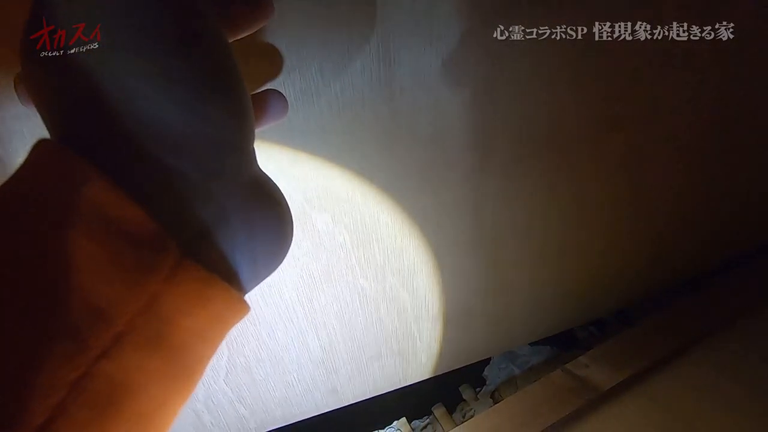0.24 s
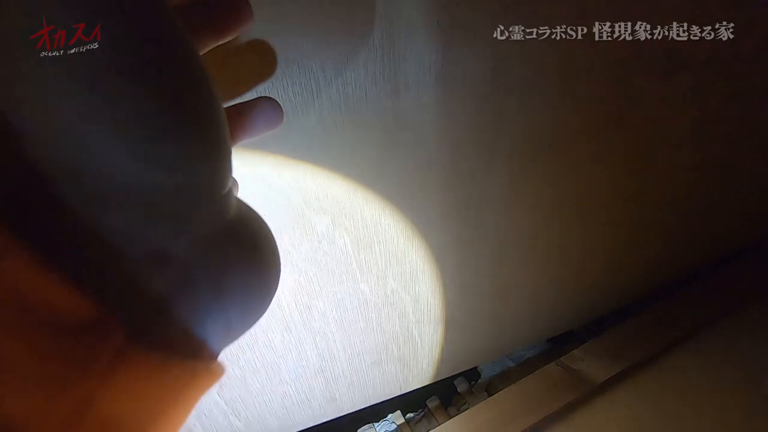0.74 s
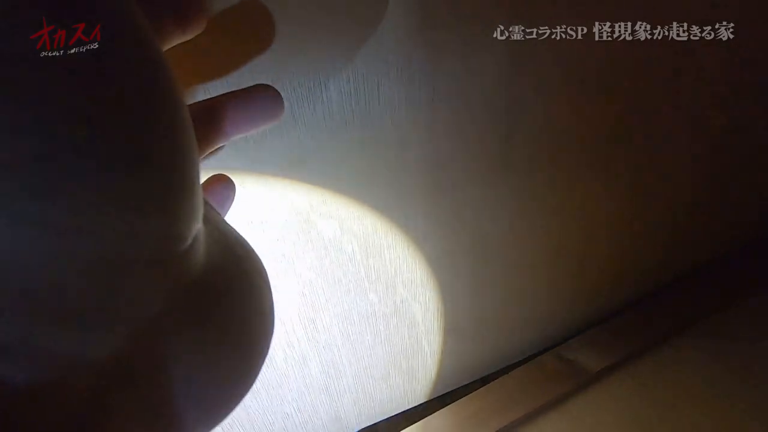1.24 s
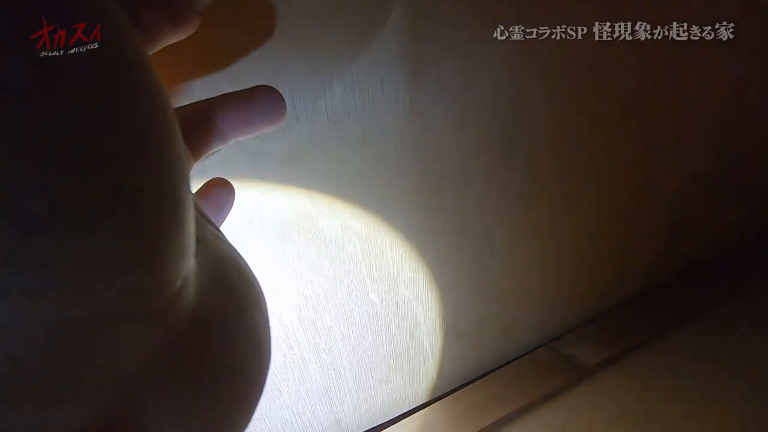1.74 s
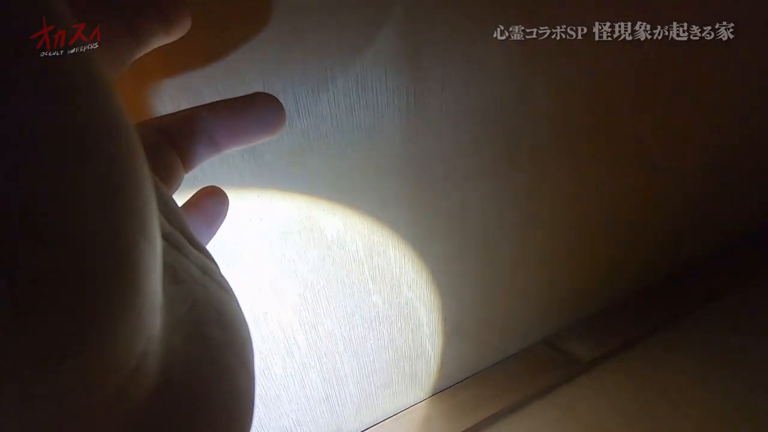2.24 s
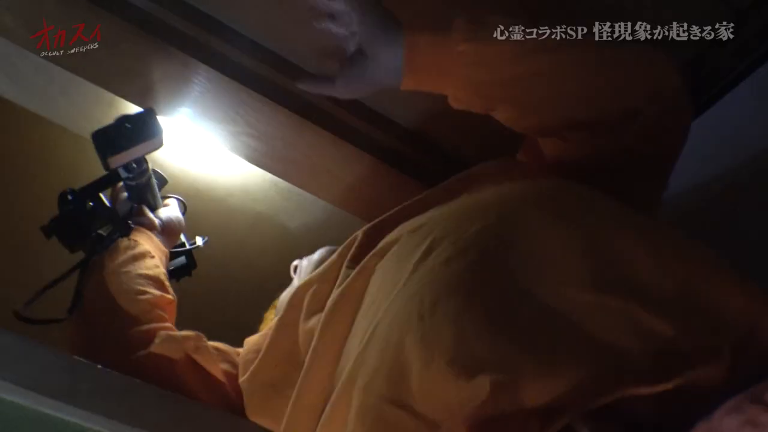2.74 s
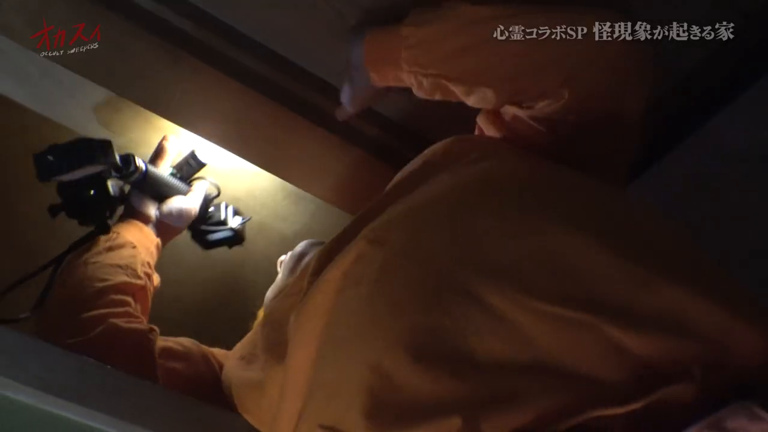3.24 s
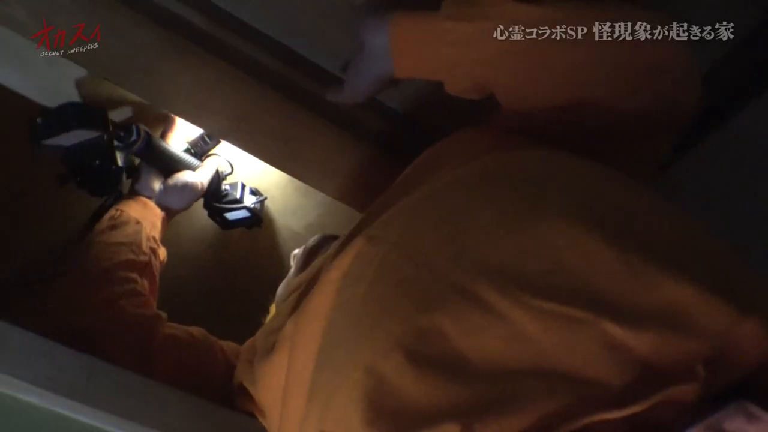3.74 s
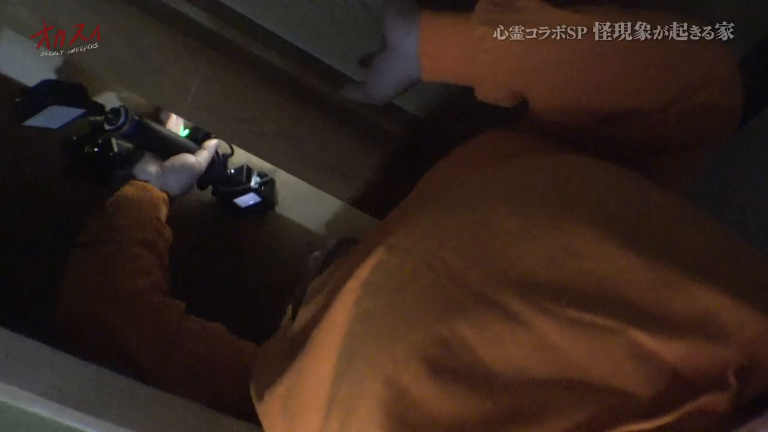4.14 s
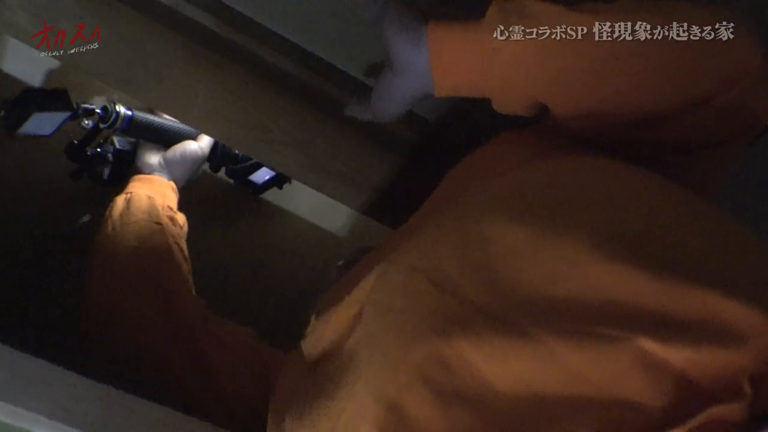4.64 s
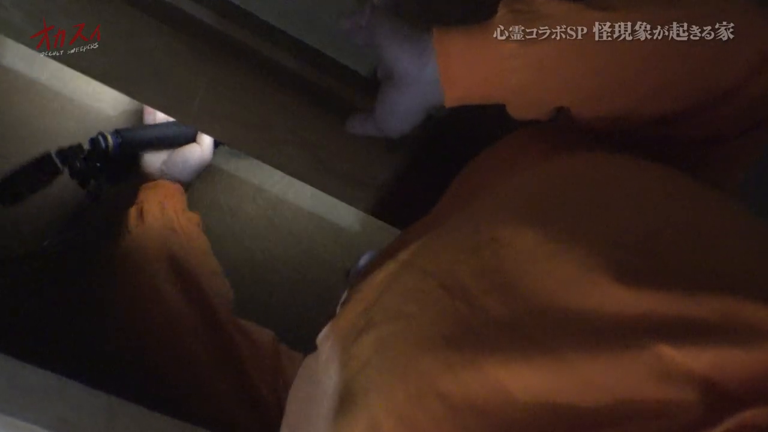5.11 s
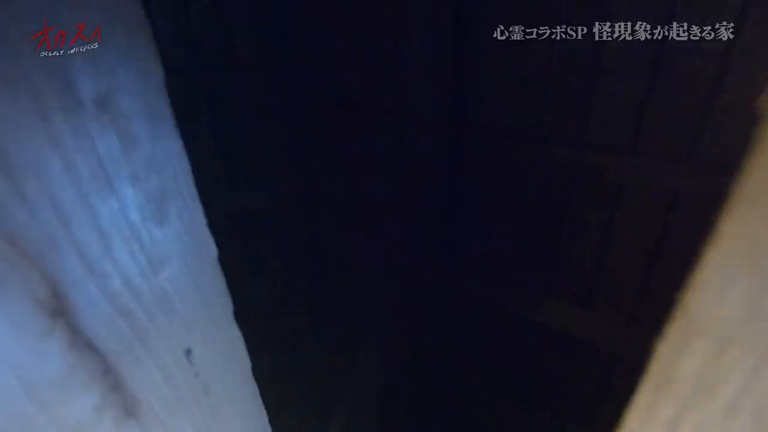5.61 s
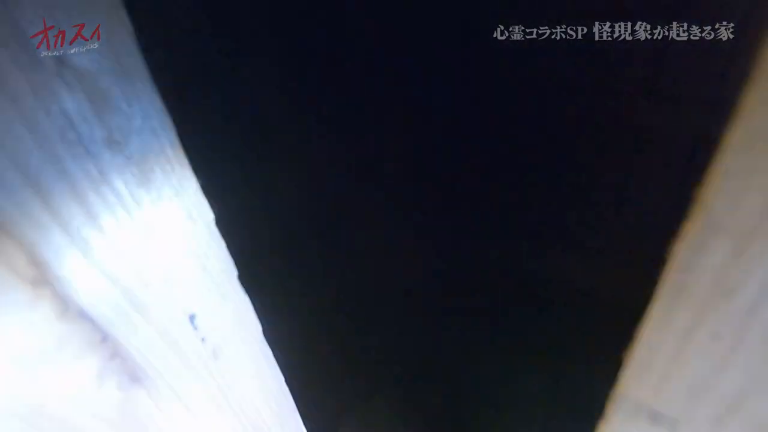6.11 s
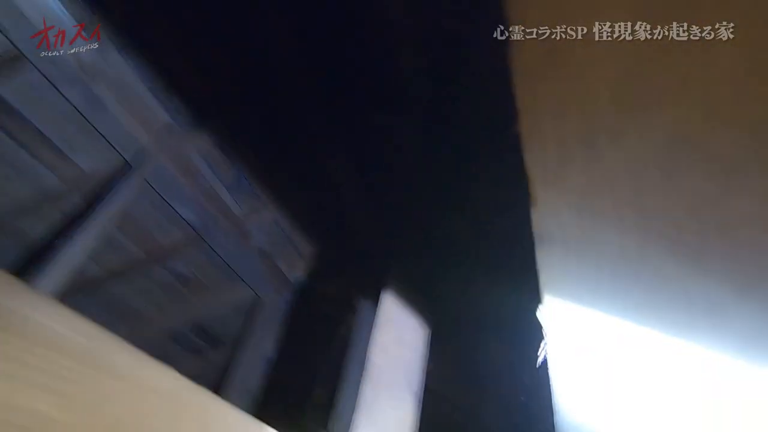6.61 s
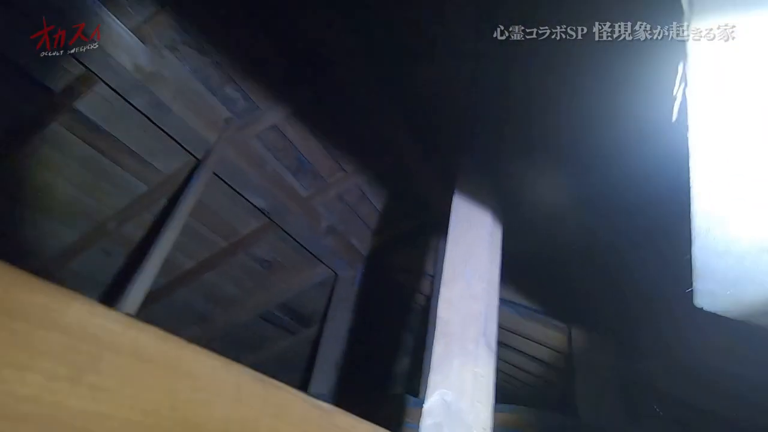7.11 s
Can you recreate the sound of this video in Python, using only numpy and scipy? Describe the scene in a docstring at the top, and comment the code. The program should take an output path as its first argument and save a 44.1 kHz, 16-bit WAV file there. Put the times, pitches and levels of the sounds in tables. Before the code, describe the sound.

A loose plywood panel judders and knocks loudly as it is shoved aside, then sleeves rub on wood amid bumps and small clinks.

```python
"""Someone climbs through a ceiling hatch, holding a camera close to the woodwork.
From the start, sleeves rub along the opening stroke by stroke: filtered noise with snags, over rumbling timbers.
Early on, the loose plywood board is shoved three times: stick-slip pulses judder it and struck modes knock.
Later the timbers are bumped on the way up, and small camera fittings clink as narrow bands of noise.
Throughout, the camera housing ticks now and then and handling shakes the microphone over a quiet house."""
import sys
import numpy as np
from scipy import signal
from scipy.fft import rfft, irfft, next_fast_len
from scipy.io import wavfile
from scipy.ndimage import map_coordinates

SR = 44100
rng = np.random.default_rng(int(sys.argv[2]) if len(sys.argv) > 2 else 0)


def store_pcm(level_fs):
    """Save levels as 16-bit WAV."""
    pcm = np.round(np.clip(level_fs, -1, 1) * 32767).astype(np.int16)
    wavfile.write(sys.argv[1], SR, np.atleast_2d(pcm).T)


N = 324884
TIME = np.arange(N) / SR

# blows on the wood: start_s, level_db (nominal peak), thud_db and crack_db (relative, before the contact
# colour's offsets), direct (push relative to the dense ring, a ratio)
KNOCK_BLOWS = [(0.273, -23, -20, -34, 0.82), (1.062, -30, 0.5, -17, 0.98), (1.2944, -9.5, -10, -20.5, 0.4),
               (1.44, -6, -13.5, -28, 0.43), (1.4737, -4, -15, -7.5, 0.22), (1.496, -4.5, -8, -18, 1.8),
               (1.546, 0, -41, -18.5, 0.7), (1.565, 2.5, -20.5, -22, 0.43), (1.724, -8, -25, -16, 0.32),
               (1.735, -2.5, -20, -16, 0.38), (1.775, -6.5, -9, -2.5, 0.7), (2.18, -29, -0.5, -25, 0.61),
               (3.003, -20, -1, -13, 0.49), (3.015, -9, -3, -21.5, 0.88), (3.072, -11.5, -17, -23.5, 0.45),
               (3.092, -17.5, -1, -33, 0.91), (3.5238, 4, -14, -15, 0.8), (4.929, 0.5, -23, -17.5, 0.72),
               (6.043, 1.5, -15.5, -36, 0.6), (6.066, -19.5, 4.5, -20, 1.3), (6.132, -16, -1, -20, 0.43),
               (6.27, -5, -3.5, -70, 0.92), (6.323, -13.5, -19, -31, 1), (6.413, -10.5, -7.5, -19.5, 0.48),
               (6.575, -10.5, -2.5, -21, 0.89), (7.296, -28, -3, -3.5, 3.1)]


def knocks(crest_db=29.0):
    """Blows set the woodwork ringing: soft, heavy contacts thud; hard edges crack."""
    out, bank = np.zeros(N), mode_bank()
    for start_s, level_db, thud_db, crack_db, direct in KNOCK_BLOWS:
        ring = wood_ring(bank, direct, modes_db=-8, life=1.44)
        contact = [(45, thud_db + 24.5), (130, thud_db + 11), (320, 0), (800, 0), (2400, crack_db + 13.5)]
        add(out, start_s, amp(level_db - crest_db) * colour(ring, contact))
    return out


# colour of the struck wood: freq_hz, gain_db
WOOD_COLOUR = [(25, -10.5), (45, -11.5), (85, -4), (130, 3), (220, 0), (330, 0), (500, 1), (720, -7.5),
               (1100, -4), (2200, -12), (4000, -24.5), (7000, -42.5), (15000, -61)]


def wood_ring(bank, direct, modes_db, life, contact_s=0.00042, scatter_db=2):
    """One blow: the brief push of the contact, then the dense ring and the strong modes at new strengths."""
    t = np.arange(SR) / SR
    push = np.sin(np.pi * np.minimum(t / contact_s, 1)) ** 2
    dense = nook(dense_ring(life), wall_db=-8.5) + direct * push / push.sum()
    dense = unit(colour(dense, WOOD_COLOUR))
    phases = np.exp(2j * np.pi * rng.random(len(bank)))
    strengths = amp(scatter_db * rng.standard_normal(len(bank))) * phases
    onset = 1 - np.exp(-t / 0.0037)  # the modes build up over a few milliseconds
    modes = (strengths @ bank).real * onset
    return unit(dense + amp(modes_db) * unit(modes))


# strong modes of the woodwork: pitch_hz, level_db (relative), t60_s
WOOD_MODES = [(121.3, 1.5, 0.33), (316.7, -4, 0.72), (350, -13, 0.65), (468, 1, 0.084), (542, 2, 0.27),
              (805, -9, 0.75), (1160, -18, 0.33), (780, -22, 0.051), (970, -3, 0.093), (1017, -30, 0.43),
              (1270, -19, 0.22), (1360, -45, 0.057), (1466, -26, 0.093), (1650, -14, 0.35),
              (1540, -21, 0.54), (1870, -30, 0.65), (1600, 9, 0.032), (2450, 11, 0.022), (2475, -45, 1),
              (2720, -21, 0.083), (3002, -34, 0.15)]


def mode_bank():
    """One damped oscillation for each strong mode of the woodwork."""
    t = np.arange(SR) / SR
    return np.array([amp(level_db - 60 * t / t60_s) * np.exp(2j * np.pi * pitch_hz * t)
                     for pitch_hz, level_db, t60_s in WOOD_MODES])


# shoves that drag the board over its frame: start_s, attack_s, level_db (at full speed)
BOARD_SHOVES = [(1.292, 0.008, -30.5), (1.44, 0.097, -16), (1.71, 0.05, -22.5)]
SHOVE_HOLD_S = 0.057  # full speed is brief
SHOVE_STOP_S, SHOVE_COAST = 0.025, 1.53  # the board slows in this time, plus this many attack times
# colour of the juddering board: freq_hz, gain_db
SCRAPE_COLOUR = [(30, -23), (55, -9), (125, 2.5), (180, -14.5), (240, 1.5), (310, -6), (400, -11),
                 (520, -0.5), (720, -4.5), (1050, -12.5), (1700, -20.5), (3200, -38.5), (5500, -54),
                 (15000, -60)]


def drag(slip_rate_hz=110, uneven=0.45, size_db=0.5):
    """The board sticks and slips at an uneven rate; each slip shakes the panel."""
    travel = np.cumsum(slip_rate_hz * np.exp(uneven * wobble(150))) / SR
    slips = np.diff(np.floor(travel), prepend=0) * amp(size_db * wobble(200))
    panel = dense_ring(life=0.3)
    panel[0] += 0.6  # the slip itself, ahead of the ring
    shaken = signal.oaconvolve(slips, panel)[:N]
    judder = unit(colour(nook(shaken, wall_db=-4.5), SCRAPE_COLOUR))
    effort = np.zeros(N)
    for start_s, attack_s, level_db in BOARD_SHOVES:
        release_s = SHOVE_STOP_S + SHOVE_COAST * attack_s
        effort += amp(level_db) * swell(start_s, attack_s, SHOVE_HOLD_S, release_s)
    return effort * judder


# strokes of cloth on wood: start_s, attack_s, hold_s, murmur_db (wood), rasp_db (rough spots), hiss_db (weave)
SLEEVE_STROKES = [(0.0, 0.0033, 0.028, -53, -57, -50), (0.061, 0.046, 0.012, -45, -47, -47),
                  (0.244, .025, 0.1, -43, -58, -76), (0.447, 0.053, 0.026, -50, -48, -59),
                  (0.634, 0.039, .25, -58.5, -76, -61), (1.019, 0.013, 0.33, -54.5, -58, -54.5),
                  (1.777, 0.088, 0.31, -57, -53.5, -54.5), (2.169, 0.074, 0.0043, -62, -49, -46),
                  (2.324, 0.071, 0.18, -53, -64, -59.5), (2.627, 0.13, 0.19, -61, -55, -48.5),
                  (3.046, 0.087, .005, -37.5, -48, -45.5), (3.2, 0.054, 0.14, -51.5, -59, -76),
                  (3.62, 0.15, 0.015, -36.5, -50, -55), (3.876, 0.099, 0.22, -39, -47.5, -58.5),
                  (4.03, .26, 0.01, -28, -51, -45), (4.345, 0.046, 0.077, -41, -56, -57),
                  (4.526, 0.049, 0.38, -47, -54.5, -57.5), (4.699, 0.037, 0.035, -32, -54, -62),
                  (5.006, 0.15, 0.055, -30.5, -39.5, -45), (5.36, 0.07, 0.052, -24, -35.5, -46.5),
                  (5.572, 0.028, .07, -70, -81, -53), (5.62, 0.017, 0.46, -66, -81, -87),
                  (6.13, 0.028, 0.21, -36.5, -44.5, -51), (6.471, 0.027, .005, -30.5, -43, -49),
                  (6.567, 0.016, 0.011, -26.5, -34, -42.5), (6.655, 0.042, 0.017, -41.5, -47, -60),
                  (6.729, 0.042, 0.068, -29, -36, -49), (6.831, 0.043, 0.17, -41.5, -46, -50),
                  (7.007, .06, 0.094, -25.5, -33.5, -41), (7.192, 0.035, 0.16, -44.5, -51, -54.5)]
STROKE_RELEASE_S, STROKE_COAST = 0.072, 0.21  # a stroke stops in this time, plus this share of its attack
MURMUR_LAG_S = 0.013  # the arm skims first, then leans in and sets the wood murmuring
# colour of the murmuring wood: freq_hz, gain_db
MURMUR_COLOUR = [(120, -11), (200, -2), (320, 2.5), (420, -4), (520, -2.5), (800, -9.5), (1100, -8.5),
                 (1600, -17.5), (2200, -15.5), (2700, -39), (3400, -41), (6000, -75), (12000, -83)]
# colour of the rough spots: freq_hz, gain_db
RASP_COLOUR = [(500, -2.5), (2000, 1), (2600, 0), (3200, -1), (4600, -13.5), (8000, -32)]
# colour of the weave: freq_hz, gain_db
WEAVE_COLOUR = [(1760, 4.5), (3000, -0.5), (3190, 1), (3490, 3), (3770, 4.5), (5200, -0.5), (8550, 0),
                (10900, -14), (13700, -4.5), (15600, -35)]
# colour of the finest fibres, which sizzle when a stroke is fast: freq_hz, gain_db
FIZZ_COLOUR = [(3000, -21), (7000, -7), (10500, 0), (13800, 0), (15600, 9)]
# fizz level in a fast stroke, that stroke's hiss, dB of fizz per dB of hiss
FIZZ_DB, FAST_HISS_DB, FIZZ_GROWTH = -57, -45.5, 1.3


def sleeves():
    """Cloth slides along the frame: the wood murmurs, rough spots rasp, and the weave hisses, brighter when fast."""
    body = friction(MURMUR_COLOUR, catches_hz=260, catch_db=-3, flutter_db=1.5)
    body = grained(body, ring_db=-1.5, life=0.78)
    rasp = friction(RASP_COLOUR, catches_hz=440, catch_db=-6, flutter_db=3.5)
    rasp = grained(rasp, ring_db=-2, life=1.5)
    weave = friction(WEAVE_COLOUR, catches_hz=910, catch_db=-4.5, flutter_db=0.56)
    fizz = friction(FIZZ_COLOUR, catches_hz=150, catch_db=0, flutter_db=7)
    out, hiss = np.zeros(N), np.zeros(N)
    for start_s, attack_s, hold_s, murmur_db, rasp_db, hiss_db in SLEEVE_STROKES:
        release_s = STROKE_RELEASE_S + STROKE_COAST * attack_s
        speed = swell(start_s, attack_s, hold_s, release_s)
        pressure = swell(start_s + MURMUR_LAG_S, attack_s, hold_s, release_s)
        rub = amp(murmur_db) * pressure * body + amp(rasp_db) * speed * rasp
        out += nook(rub, wall_db=-4.5)
        hiss += speed * amp(hiss_db)
    fizz_gain = amp(FIZZ_DB) * (hiss / amp(FAST_HISS_DB)) ** FIZZ_GROWTH
    cloth = hiss * weave + fizz_gain * fizz
    return out + nook(cloth, wall_db=-11)


# short scuffs of a sleeve: start_s, level_db (nominal peak), hiss_db (relative, before the cloth colour's
# offsets), length_s
SLEEVE_SCUFFS = [(0.283, -23.5, -26, 0.027), (3.141, -25, -11, 0.026), (4.404, -21.5, -21, 0.015),
                 (6.065, -12, -18.5, 0.035), (6.096, -22.5, -9, 0.034), (6.13, -9.5, -13.5, 0.021),
                 (6.324, -16, -15, 0.02), (6.411, -23.5, -12, 0.036), (6.497, -18.5, -10, 0.011),
                 (6.793, -10.5, -17, 0.02)]


def scuffs(rise_s=0.0028, grit_db=3, crest_db=13.5):
    """A sleeve catches and lets go in a short gritty burst."""
    out, t = np.zeros(N), np.arange(SR // 4) / SR
    for start_s, level_db, hiss_db, length_s in SLEEVE_SCUFFS:
        grit = rng.standard_normal(len(t)) * amp(grit_db * rng.standard_normal(len(t)))
        grit = nook(grit, wall_db=3)
        cloth = [(150, 8.5), (600, 5.5), (1800, 7.0), (3400, -3.5),
                 (5500, hiss_db + 6.5), (11000, hiss_db - 2.0), (14000, hiss_db - 4)]
        burst = (1 - np.exp(-t / rise_s)) * np.exp(-(t / length_s) ** 2)
        add(out, start_s, amp(level_db - crest_db) * unit(colour(grit, cloth)) * burst)
    return out


# squeaky clinks of the camera fittings: start_s, level_db (nominal peak), pitch_hz, chafe_db (relative to ring)
FITTING_CLINKS = [(4.949, -36, 6900, 0), (5.291, -34.5, 4100, -12.5), (5.639, -38, 4170, -17.5),
                  (5.681, -34, 4040, -3), (5.8015, -44, 4170, -2.5), (5.855, -32.5, 4300, -2),
                  (5.916, -36, 4330, -4), (5.9857, -36, 4400, -4), (6.133, -20.5, 7000, -2),
                  (6.772, -28.5, 4400, -6)]


def clinks(cycles=380, rise_s=0.0011, width_hz=480, crest_db=10):
    """Small fittings chafe together and ring; the higher the pitch, the sooner it dies."""
    out, t = np.zeros(N), np.arange(SR // 4) / SR
    chafe_colour = [(600, -34), (2000, 6), (4500, 8), (8500, 15), (11000, -8), (15000, -9)]
    for start_s, level_db, pitch_hz, chafe_db in FITTING_CLINKS:
        grit = rng.standard_normal(len(t))
        edges_hz = [pitch_hz - width_hz / 2, pitch_hz + width_hz / 2]
        band = signal.butter(2, edges_hz, "band", fs=SR, output="sos")
        ring = unit(signal.sosfilt(band, grit))
        chafe = unit(colour(grit, chafe_colour))
        decay = amp(level_db - crest_db - 60 * t * pitch_hz / cycles)  # falls 60 dB in this many cycles
        add(out, start_s, decay * (1 - np.exp(-t / rise_s)) * (ring + amp(chafe_db) * chafe))
    return out


# dry ticks of the camera housing: start_s, level_db (at the onset)
HOUSING_TICKS = [(1.026, -44.5), (1.489, -45), (1.5384, -44), (2.5314, -45), (3.016, -41), (3.024, -40),
                 (4.29, -36), (5.6366, -43), (6.1315, -44), (6.279, -39)]


def ticks(t60_s=0.066):
    """The housing gives a bright, dry tick under the grip: a fast-fading burst of noise."""
    out, t = np.zeros(N), np.arange(SR // 8) / SR
    for start_s, level_db in HOUSING_TICKS:
        snap = colour(rng.standard_normal(len(t)), [(1000, 1), (4000, 8.5), (9000, 3), (15000, -9)])
        add(out, start_s, amp(level_db - 60 * t / t60_s) * unit(snap))
    return out


# weight bearing on the timbers: time_s, level_db (rumble, before its unsteadiness)
TIMBER_LOAD = [(0.0, -46.5), (0.35, -44), (1.0, -50), (1.33, -47), (1.5, -27.5), (1.64, -26.5),
               (2.13, -41.5), (2.81, -55), (3.04, -64), (3.16, -61), (3.51, -67), (3.65, -46), (4.14, -32),
               (4.74, -40.5), (4.92, -24), (5.05, -26.5), (5.76, -51), (6.05, -57), (6.22, -31.5),
               (6.42, -34), (7.14, -31), (7.37, -33.5)]
# colour of the timber rumble: freq_hz, gain_db
TIMBER_COLOUR = [(24, -4.5), (40, -11.5), (59, -1), (124, 5), (178, -9.5), (242, -3), (281, -27),
                 (318, -19), (390, -14.5), (418, -14.5), (452, -15.5), (501, -11.5), (600, -34), (780, -48),
                 (1320, -120)]
# sway of the hand-held camera: time_s, level_db
CAMERA_SHAKE = [(0.0, -23), (2.56, -26), (2.67, -34.5), (3.04, -25), (3.34, -27), (3.42, -39), (3.69, -19),
                (4.27, -31.5), (5.35, -23.5), (5.46, -33), (6.77, -23.5), (7.37, -33)]
# colour of the sway, before its swing is evened: freq_hz, gain_db
SWAY_COLOUR = [(2, -17), (7, -5), (12, 1.5), (18, -14.5), (28, -24), (40, -25.5), (55, -37), (120, -86)]


def handling(unsteady_db=0.5):
    """The timbers rumble under shifting weight, and the camera sways far below them in pitch."""
    weight = amp(np.interp(TIME, *np.transpose(TIMBER_LOAD)) + unsteady_db * wobble(7.6))
    rumble = friction(TIMBER_COLOUR, catches_hz=64, catch_db=-11, flutter_db=1)
    rocking = signal.hilbert(colour(rng.standard_normal(N), SWAY_COLOUR))
    rocking = unit(rocking.real / np.sqrt(np.abs(rocking) + 1e-9))  # an arm rocks with a fairly even swing
    shake = amp(np.interp(TIME, *np.transpose(CAMERA_SHAKE)))
    return weight * rumble + shake * rocking


# colour of the quiet house and microphone hiss: freq_hz, gain_db
STILL_COLOUR = [(24, -19), (40, -31), (64, -2), (273, -69), (317, -25), (387, -19), (497, -22), (563, -27),
                (638, -19), (1050, -27), (1320, -26), (7930, -35), (15600, -41.5)]


def still_house():
    """The quiet of the house and the hiss of the microphone: steady coloured noise."""
    return amp(-53.5) * unit(colour(rng.standard_normal(N), STILL_COLOUR))


def friction(spectrum, catches_hz, catch_db, flutter_db):
    """Rubbing noise of rms 1: a smooth slide plus fibres that catch so many times a second."""
    snags = (rng.random(N) < catches_hz / SR) * rng.standard_normal(N)
    slide = rng.standard_normal(N) + amp(catch_db) * unit(snags)
    return unit(colour(slide * amp(flutter_db * wobble(70)), spectrum))


def grained(x, ring_db, life):
    """Rubbing keeps the same fine resonances of a panel sounding."""
    panel = amp(ring_db) * dense_ring(life)
    panel[0] += 1  # the rub itself
    return unit(signal.oaconvolve(x, panel)[:N])


SWELL_DEPTH_DB, SWELL_BEND = 20.5, 1.065  # a movement starts and ends this far down; the bend rounds the slope


def swell(start_s, attack_s, hold_s, release_s):
    """Gain of one movement: it gathers speed, holds and slows down."""
    before = (start_s + attack_s - TIME) / attack_s
    after = (TIME - start_s - attack_s - hold_s) / release_s
    away = np.maximum(before, after)
    return amp(-SWELL_DEPTH_DB * np.clip(away, 0, 10) ** SWELL_BEND)


# dense ring of the panels and the room: freq_hz, t60_s (at a life of 1)
RING_DECAY = [(70, 0.94), (200, 0.46), (550, 0.24), (1500, 0.16), (4000, 0.11), (12000, 0.18)]


def dense_ring(life):
    """Countless weak modes: noise of energy 1 that dies at its own pace in each band; life scales the t60."""
    hz, t, z = signal.stft(rng.standard_normal(SR), SR, nperseg=256)
    t60_s = life * along(RING_DECAY, hz)[:, None]
    tail = signal.istft(z * amp(-60 * t / t60_s), SR, nperseg=256)[1][:SR]
    return tail / np.linalg.norm(tail)


def nook(x, wall_db, count=7):
    """Close timbers send back a few quick echoes, combing the sound anew at each spot."""
    delay_s, size = rng.uniform(0.002, 0.016, count), rng.standard_normal(count)
    echoes = size / np.linalg.norm(size) * amp(wall_db)
    walls = np.bincount((delay_s * SR).astype(int), echoes)
    walls[0] = 1  # the direct sound
    return signal.oaconvolve(x, walls / np.linalg.norm(walls))[:len(x)]


def amp(db):
    """Decibels to gain."""
    return 10 ** (np.asarray(db) / 20)


def unit(x):
    """Scale to rms 1."""
    return x / np.sqrt(np.mean(x ** 2) + 1e-20)


def along(points, hz):
    """(Hz, value) points read on a log axis."""
    f, v = np.transpose(points)
    return np.interp(np.log(hz + 1), np.log(f + 1), v)


def wobble(rate_hz):
    """A smooth random curve, so many knots a second."""
    return map_coordinates(rng.standard_normal(4096), [TIME * rate_hz], mode="wrap")


def colour(x, points):
    """Causal minimum-phase filter with the gain of (Hz, dB) points."""
    n = x.shape[-1]
    m = 2 * next_fast_len(n // 2 + SR // 8)
    gain = amp(along(points, np.fft.rfftfreq(m, 1 / SR)))
    cepstrum = irfft(np.log(gain + 1e-6), m)
    cepstrum[1:m // 2] *= 2  # folding the cepstrum forward makes the filter causal
    cepstrum[m // 2 + 1:] = 0
    return irfft(rfft(x, m) * np.exp(rfft(cepstrum)), m)[..., :n]


def add(track, start_s, sound):
    """Mix a sound into a track at start_s."""
    part = track[max(round(start_s * SR), 0):][:len(sound)]
    part += sound[:len(part)]


# colour of the late echo at the sides: freq_hz, gain_db
ECHO_COLOUR = [(15, -65), (40, -39), (120, -39.5), (550, -24), (1200, -33.5), (3000, -39.5), (7000, -35.5),
               (13000, -19)]


def scene(echo_delay_s=0.072):
    """Everything is close and central; a faint, late, diffuse echo, opposite in left and right, widens it."""
    mid = knocks() + drag() + sleeves() + scuffs() + clinks() + ticks() + handling() + still_house()
    echo = np.zeros(N)
    add(echo, echo_delay_s, signal.oaconvolve(mid, dense_ring(life=0.8)))
    side = colour(echo, ECHO_COLOUR)
    return np.array([mid + side, mid - side])


TOP_HZ = 15750  # band limit


def record(dry):
    """The camera rounds off the highest peaks and keeps nothing above its band limit."""
    held = dry / (1 + np.abs(dry) ** 6) ** (1 / 6)
    m = next_fast_len(N + SR // 4)
    passed = np.fft.rfftfreq(m, 1 / SR) < TOP_HZ
    return irfft(rfft(held, m) * passed, m)[..., :N]


dry = scene()
out = record(dry)
store_pcm(out)
```